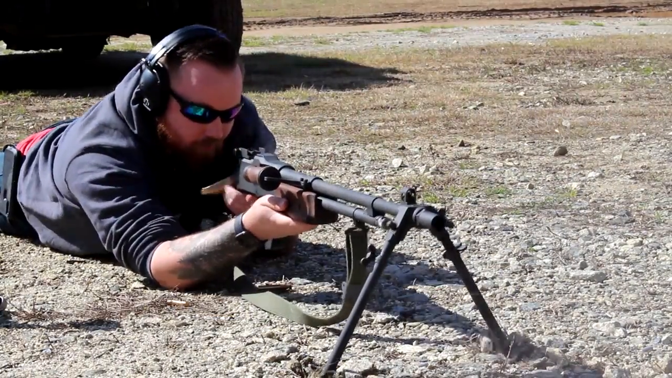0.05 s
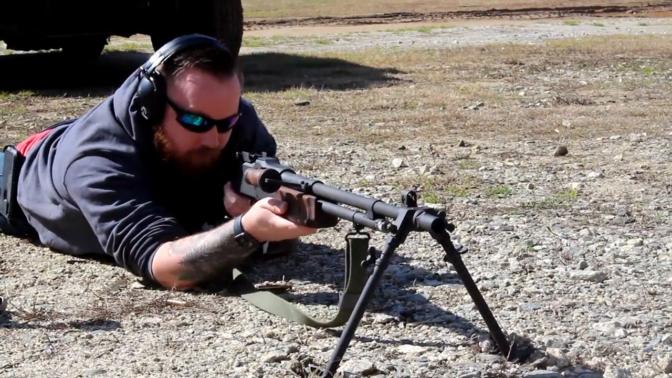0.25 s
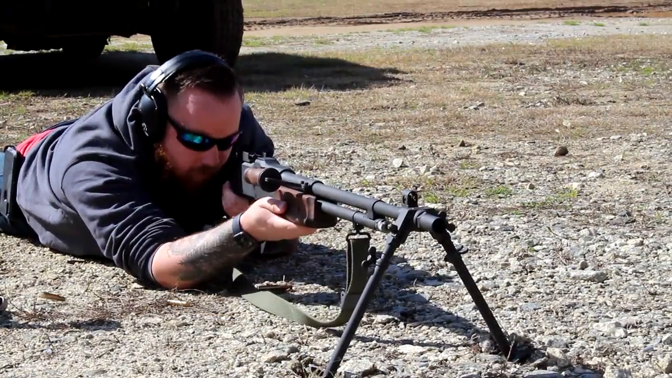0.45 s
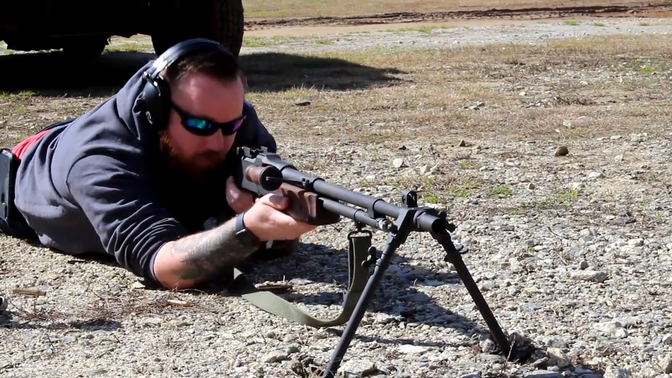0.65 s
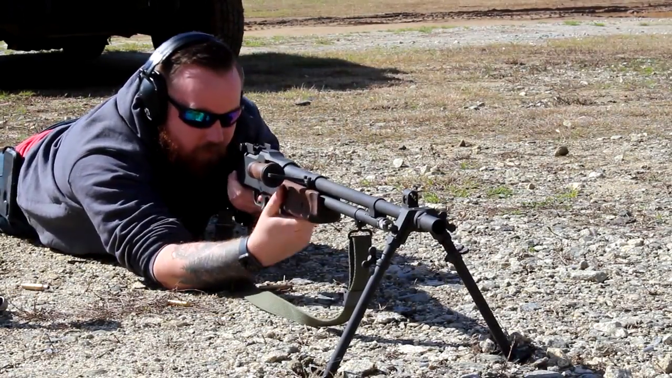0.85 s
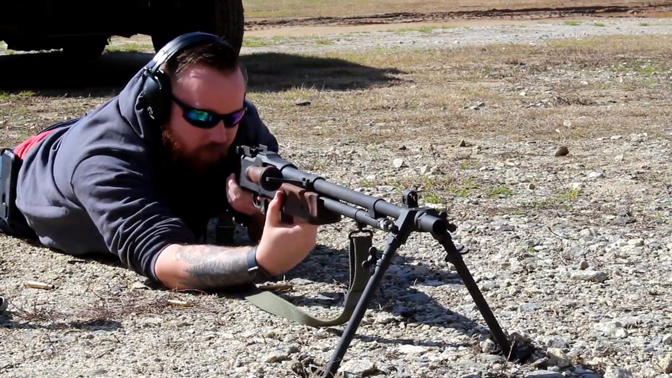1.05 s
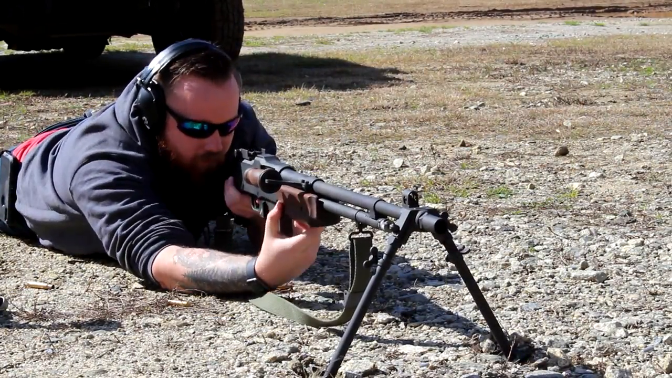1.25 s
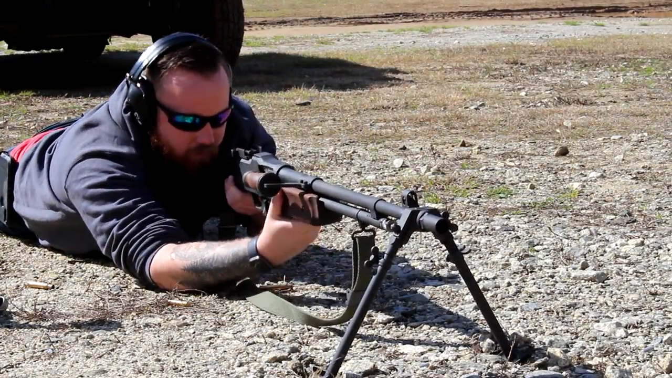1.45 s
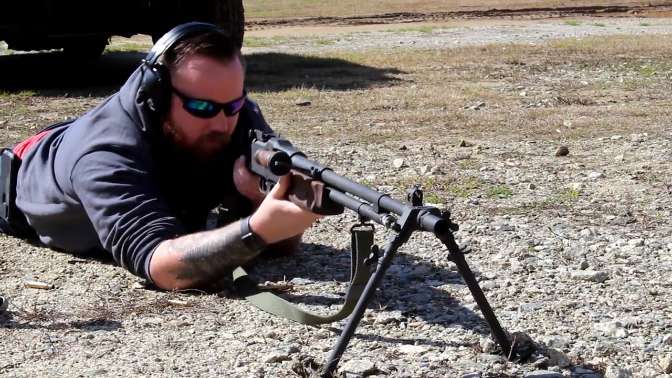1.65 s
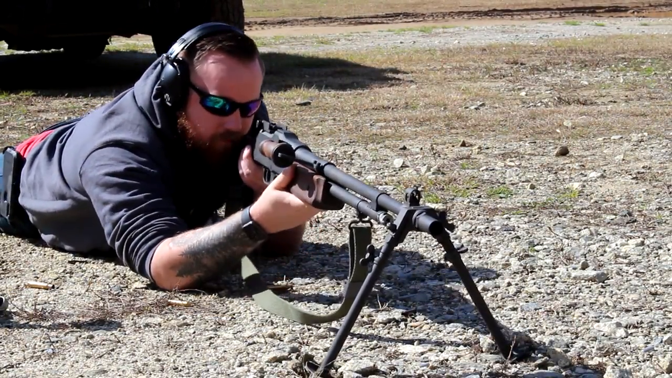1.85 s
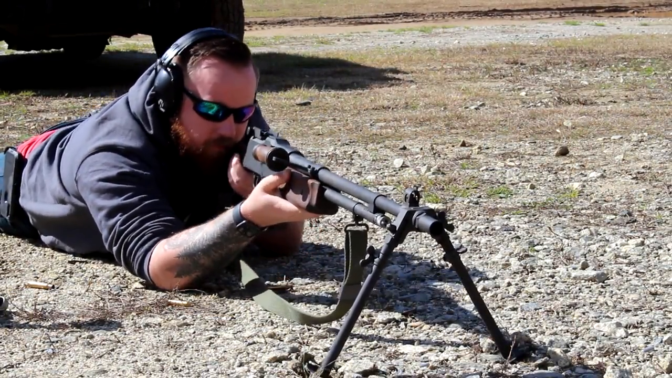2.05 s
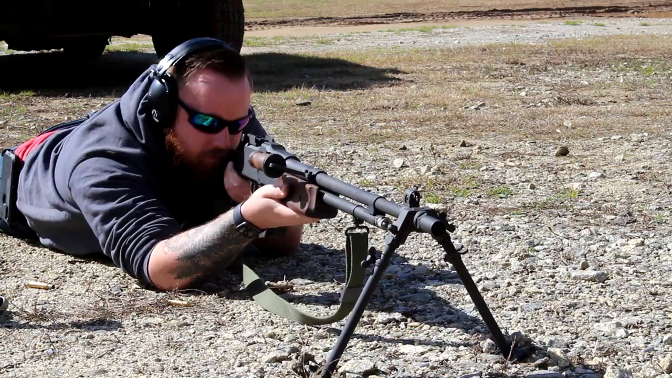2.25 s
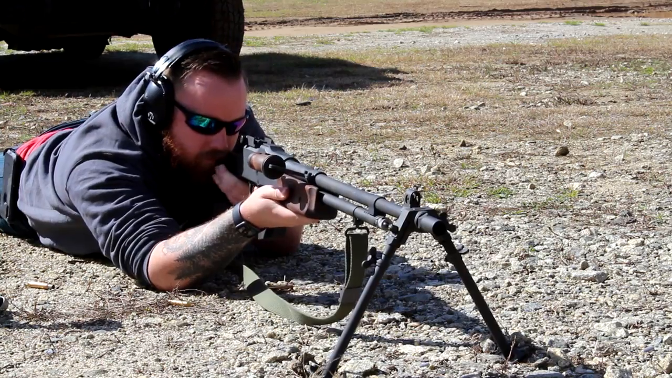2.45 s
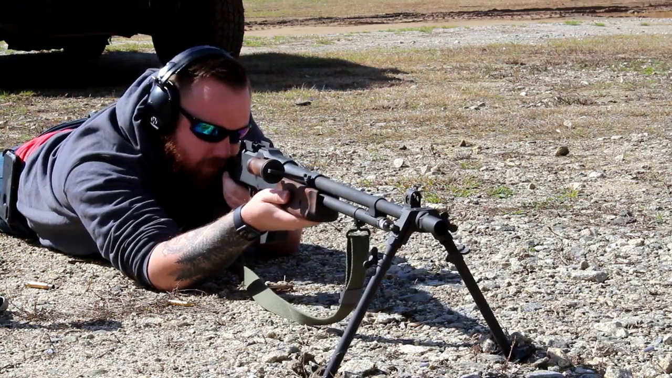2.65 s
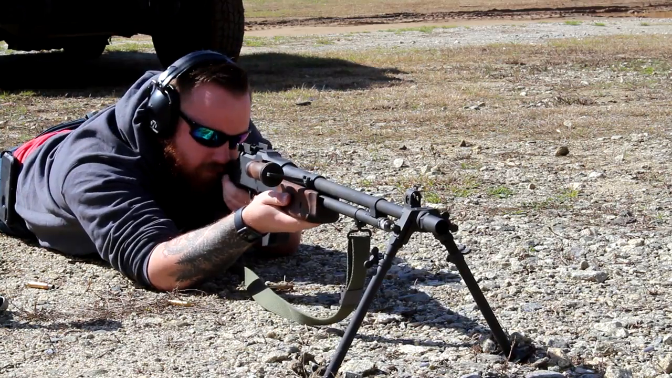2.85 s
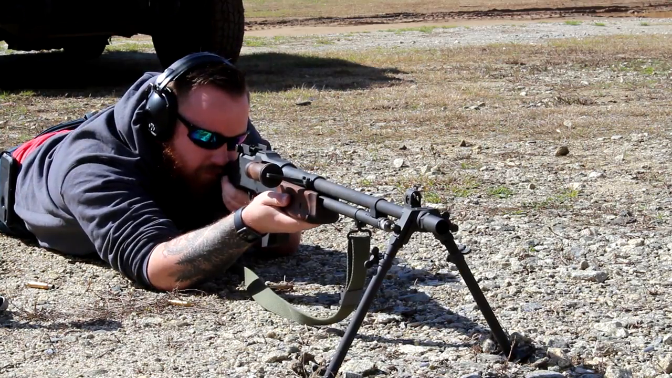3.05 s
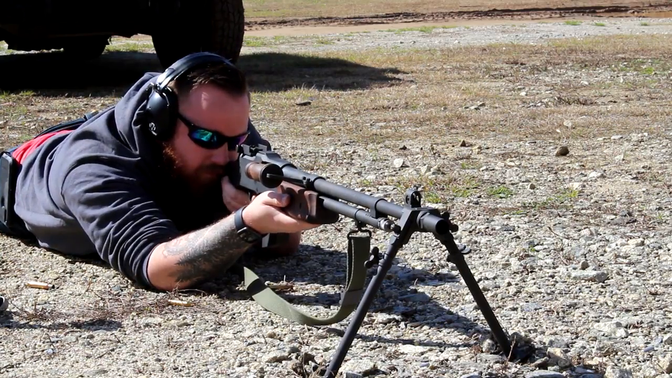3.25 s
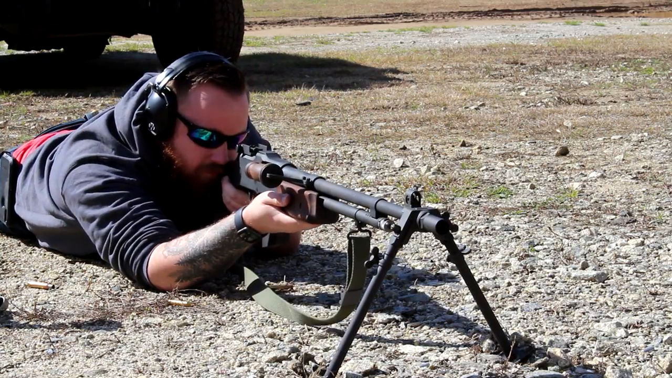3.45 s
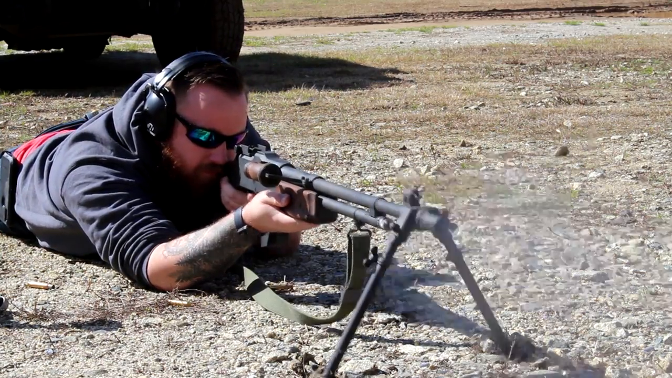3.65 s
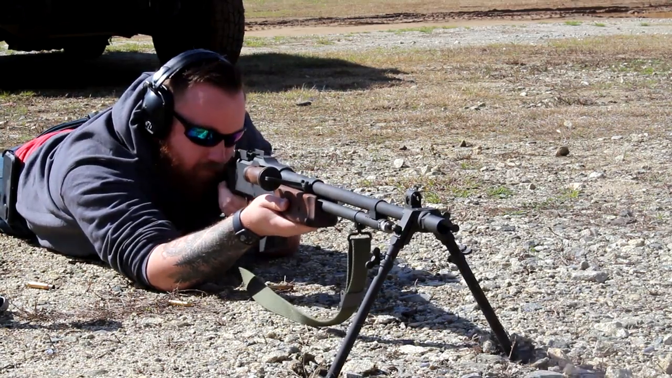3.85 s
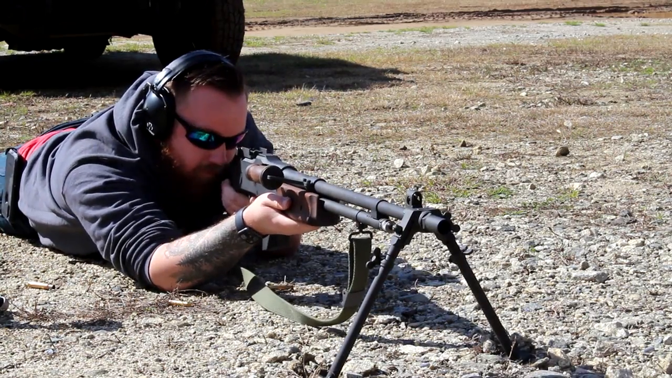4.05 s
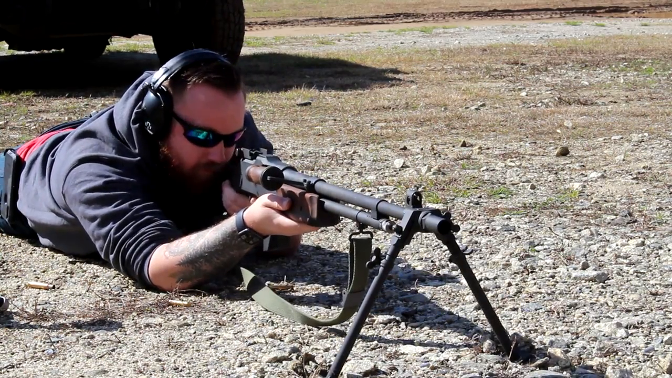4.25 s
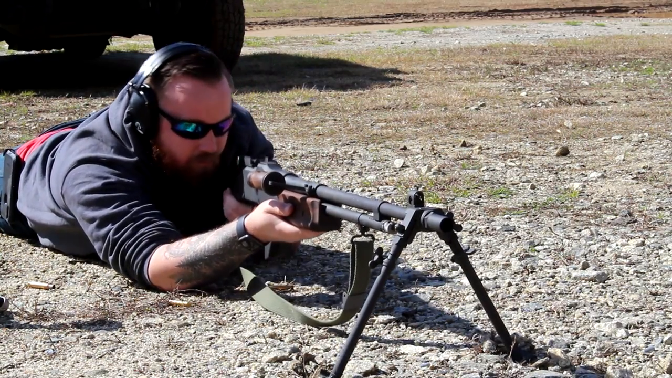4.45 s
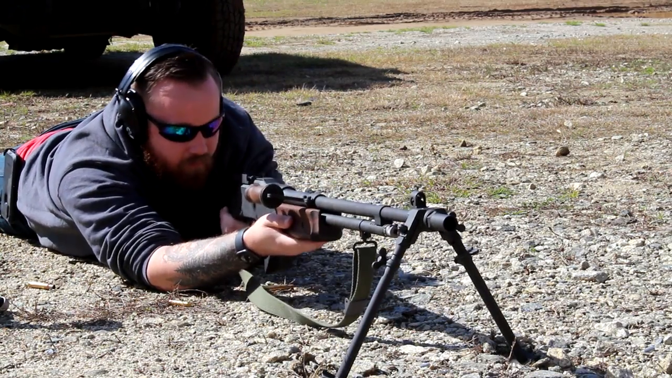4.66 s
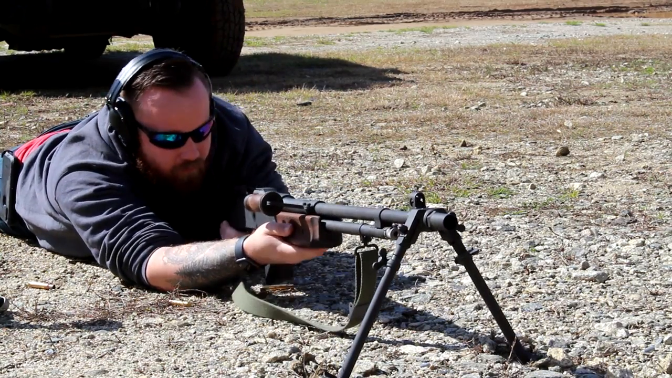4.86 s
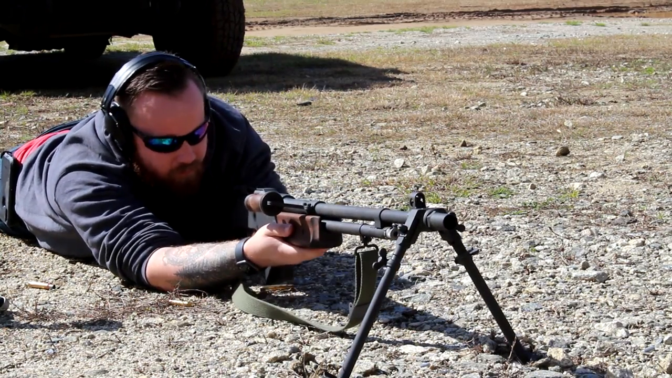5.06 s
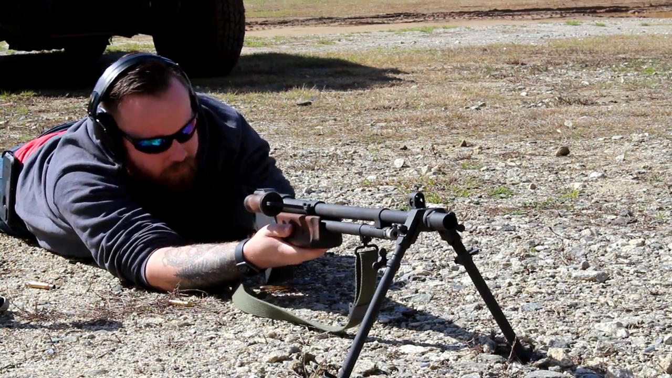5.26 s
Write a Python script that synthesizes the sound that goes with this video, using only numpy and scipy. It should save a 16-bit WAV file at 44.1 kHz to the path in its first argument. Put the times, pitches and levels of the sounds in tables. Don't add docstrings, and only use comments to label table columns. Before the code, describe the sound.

An open gravel range, heard by a camera microphone near the shooter. The tail of an earlier shot is still rolling when, at about 0.02 s, a rifle fires: a flattened, overloaded blast with a gassy roar. About 0.1 s later a low, buzzing slap returns from a ribbed wall, heavier on the left, then clumped echoes from trees and hills, losing treble and sinking to a dull roll over seconds. From 0.4 to 1 s a flying case rings faintly and unevenly, very high. A buckle scrapes softly around 1.1-1.3 s; tiny metal and gravel ticks scatter until 3.4 s. Low wind gusts buffet the microphone, strongest near 0.6, 2.9 and 3.6 s, while ducked hiss slowly returns. At 3.73 s a second, louder shot repeats the slap and rolling echo. Brass clinks quickly on stones around 4.6 s, a sharper tick follows at 4.84 s, and the echo continues fading to the end.

```python
import sys
import numpy as np
from scipy import signal
from scipy.fft import rfft, irfft, next_fast_len
from scipy.io import wavfile
from scipy.ndimage import uniform_filter1d

SR = 44100
rng = np.random.default_rng(int(sys.argv[2]) if len(sys.argv) > 2 else 0)


def pcm_store(signal):
    levels = np.round(np.clip(np.atleast_2d(signal), -1, 1) * 32767)
    wavfile.write(sys.argv[1], SR, levels.astype(np.int16).T)


def field_ratio(decibels):
    return 10 ** (np.asarray(decibels, dtype=float) / 20)


N = 233938
LONG = next_fast_len(N)
TOP_HZ = 15900
EARLIER_SHOT_S = -0.215
# (time [s], blast level [dB])
SHOTS = [
    (0.0218, -7),
    (3.7293, -4),
]


def at(table, hz):
    points_hz, values = np.array(table).T
    return np.interp(np.log(hz + 1), np.log(points_hz), values)


def unit(x):
    return x / np.sqrt(np.mean(x ** 2))


def band(x, lo_hz, hi_hz, order=2):
    limits_hz = [lo_hz, min(hi_hz, 0.45 * SR)]
    return signal.sosfilt(signal.butter(order, limits_hz, "band", fs=SR, output="sos"), x)


def ring(hz, t60, length):
    t = np.arange(int(length * SR)) / SR
    return np.sin(2 * np.pi * hz * t) * np.exp(-np.log(1000) * t / t60)


def walk(rate):
    hold = int(SR / rate)
    goals = np.repeat(rng.standard_normal(N // hold + 1), hold)
    return uniform_filter1d(uniform_filter1d(goals, hold), hold)[:N]


def add(out, x, s):
    i = int(s * SR)
    out[..., i:i + x.shape[-1]] += x[..., :N - i]


def sides(pan_db):
    return np.array([[pan_db], [-pan_db]]) / 2


def swells(events, quiet):
    t = np.arange(N) / SR
    power = quiet ** 2
    for s, db, half_s in events:
        power = power + field_ratio(2 * db) * np.exp(-2 * ((t - s) / half_s) ** 2)
    return np.sqrt(power)


def since_shot():
    t = np.arange(N) / SR
    starts = np.array([EARLIER_SHOT_S, SHOTS[0][0], SHOTS[1][0]])
    shot = np.searchsorted(starts, t, side="right") - 1
    return shot, t - starts[shot]


def sag_db():
    shot, since = since_shot()
    depth_db = np.array([4, 5, -0.5])[shot]
    dropped = (1 + np.tanh((since - 0.42) / 0.11)) / 2
    not_yet_back = (1 - np.tanh((since - 1.2) / 0.28)) / 2
    return depth_db * dropped * not_yet_back


def hiss_gain():
    # (time [s], level [dB], half length [s])
    rustles = [
        (1.66, -68, .04),
        (4.255, -65, .015),
        (4.875, -65, .035),
    ]
    open_db, duck_db, settle_s = -67.5, 22, 1.9
    since = since_shot()[1]
    db = open_db - duck_db * (1 - np.tanh((since - 0.6) / 0.07)) / 2
    db = db - 2 * np.maximum(settle_s - since, 0) - 2 * np.maximum(since - settle_s, 0)
    return swells(rustles, field_ratio(db - 1.2 * sag_db()))


def hiss():
    # (frequency [Hz], level per Hz [dB])
    colour = [(180, -37), (300, -2.5), (470, -4), (519, -10.5), (1480, -20.5), (1610, -18), (4020, -21.5),
              (10200, -31), (16000, -38.5)]
    hz = np.fft.rfftfreq(LONG, 1 / SR)
    crackle_db = 2 * np.minimum(rng.exponential(size=N), 6)
    noise = rng.standard_normal((3, N)) * field_ratio(crackle_db)
    pair = noise[:2] + 0.5 * noise[2]
    out = irfft(rfft(pair, LONG) * field_ratio(at(colour, hz)) * (hz < TOP_HZ), LONG)[:, :N]
    out = out / np.std(band(out.mean(axis=0), 7600, 17000, order=4))
    return out * hiss_gain() * field_ratio(0.51 * walk(8.1))


def wind():
    # (time [s], level [dB], half length [s])
    gusts = [(.35, -47, .09), (.59, -36.5, 0.088), (.81, -55, .07), (1.58, -49., .08), (1.94, -46, .06),
             (2.12, -48, 0.07), (2.45, -41, 0.23), (2.68, -44, 0.036), (2.86, -36, 0.038),
             (3.0, -43, 0.037), (3.14, -46.5, .05), (3.32, -42.5, 0.054), (3.6, -32.5, 0.085),
             (4.35, -50., 0.047), (4.6, -51., 0.081), (5.24, -56, .12)]
    lull_db = -61
    rumble = unit(band(rng.standard_normal((2, N)), 39, 108)) * field_ratio(np.array([[4], [0]]))
    return rumble * swells(gusts, field_ratio(lull_db)) * field_ratio(-3)


def scatterers():
    # (time after the shot [s], level [dB])
    landmarks = [(.058, 9), (0.243, 10), (0.26, 10.5), (.302, 10.5), (.339, 13), (.379, 15), (.462, 12),
                 (.5, 8), (.566, 13), (1.055, 13.5), (1.222, 8.5), (1.338, 3), (1.631, 3), (1.8, 7.5),
                 (1.84, 12.5), (2.247, 4), (2.289, 5), (2.596, 13.5), (2.739, 10)]
    size = rng.standard_normal((2, N)) * field_ratio(2.14 * rng.exponential(size=(2, N)))
    size = unit(size * field_ratio(1.6 * walk(45) + 1.33 * walk(200)))
    t = np.arange(int(0.03 * SR)) / SR
    swell_and_fade = np.exp(-t / 0.0043) * np.minimum(t / 0.002, 1)
    for s, db in landmarks:
        top_hz = 1700 / (s + 0.23)
        burst = unit(band(rng.standard_normal(len(t)), 180, top_hz)) * np.sqrt(2 * top_hz / SR)
        add(size[0], burst * swell_and_fade * field_ratio(db - 2.5), s - 0.002)
    return size


def echo_levels():
    # (time after the shot [s], level at 300 Hz [dB], extra at 1 kHz [dB],
    # rise [dB/s], fall [dB/s])
    terrain = [(0.027, -16.5, -6.5, 28, 334), (.055, -31.5, 1, 303, 250.), (0.097, -20.5, 0.5, 427, 330.),
               (.16, -26, -13, 61, 12.5), (.207, -38.5, 6.5, 1200., 22), (.26, -32.5, 7.5, 400., 55),
               (.32, -31.5, 7, 212, 42.5), (.42, -35, 7.5, 122.5, 25.5), (.54, -33, 8.5, 85, 36),
               (.8, -32.5, -5, 28.5, 18), (1.06, -28.5, -7.5, 45, 23), (1.3, -33, -6, 15.5, 7),
               (1.72, -30, -5.5, 12.5, 17.5), (2.1, -36, -9.5, 6.5, 10.5)]
    shot, since = since_shot()
    low, mid = 0, 0
    for s, db, bright_db, rise, fall in terrain:
        before, after = np.maximum(s - since, 0), np.maximum(since - s, 0)
        power = field_ratio(2 * (db - rise * before - fall * after))
        low = low + power
        mid = mid + power * field_ratio(2 * (bright_db - 2.5 * after))
    gain_db = np.array([1.5, -0.05, -0.53])[shot] - sag_db()
    db_300 = 10 * np.log10(low) + gain_db
    db_1k = 10 * np.log10(mid) + gain_db
    wall_db = 7.5 * np.exp(-((since - 0.095) / 0.039) ** 2)
    slope_db = 4 * (1 + np.tanh((since - 1.44) / 0.11)) / 2
    db_3k = db_1k - 4 - 4.5 * since - wall_db - slope_db
    db_7k = db_3k - 1 - np.minimum(26 * since, 37)
    db_11k = db_7k + 0.93 * (db_7k - db_3k) + 4
    db_15k = db_7k + 2.2 * (db_7k - db_3k) + 7
    bass_db = uniform_filter1d(np.minimum(db_300, -27), int(0.06 * SR))
    bass_db += 5 * np.exp(-((since - 0.45) / 0.9) ** 2) - 0.88 * since
    bass_db -= 6 * np.exp(-((since - 0.14) / 0.08) ** 2)
    return np.array([bass_db, db_300, db_1k, db_3k, db_7k, db_11k, db_15k])


def echo():
    # (frequency [Hz], level per Hz [dB])
    colour = [(35, -62.5), (70, -37.5), (130, -27.5), (300, -23.5), (550, -30), (1000, -30.5), (3000, -32),
              (5000, -34), (7000, -39.5), (11000, -50.5), (16000, -64)]
    # (frequency [Hz], left minus right [dB])
    balance = [(60, 21.5), (110, 15), (200, 13.5), (380, 13), (700, 10.0), (1290, 6), (2380, 2.5),
               (4400, 0.5), (8120, -1), (15000, -3.5)]
    # (frequency [Hz], likeness [0-1])
    likeness = [(60, 0.6), (130, 0.59), (300, 0.89), (700, 0.7), (1500, 0.36), (3000, 0.8), (7000, 0.09),
                (15000, 0.23)]
    repeat_share = 0.7
    size = scatterers()
    since = (since_shot()[1] * SR).astype(int)
    pattern = np.sqrt(repeat_share) * size[:, since] + np.sqrt(1 - repeat_share) * size[:, ::-1]
    hz = np.fft.rfftfreq(LONG, 1 / SR)
    first, second = rfft(pattern, LONG) * field_ratio(at(colour, hz)) * (hz < TOP_HZ) * np.sqrt(SR / 2)

    like = np.clip(at(likeness, hz), 0, 1)
    right = field_ratio(-at(balance, hz))
    late = np.exp(-2j * np.pi * hz * 6e-5)
    level = 2 / np.sqrt(1 + right ** 2 + 2 * like * right)
    mixed = like * first + np.sqrt(1 - like ** 2) * second
    pair = level * np.array([first * late, right * mixed])

    levels, known = echo_levels(), np.log([130, 330, 1000, 3000, 6500, 11000, 15000])
    centres = np.log(117 * 2 ** np.arange(0, 7.1, 0.5))
    out = 0
    for row, centre in zip(np.eye(len(centres)), centres):
        weights = np.array([np.interp(centre, known, weight) for weight in np.eye(len(known))])
        part = irfft(pair * np.interp(np.log(hz + 1), centres, row), LONG)[:, :N]
        out = out + part * field_ratio(weights @ levels)
    return out


def ticks():
    # (time [s], peak level [dB], brightness [octaves from 5.5 kHz], left minus right [dB])
    contacts = [(1.1011, -43, -0.07, -2), (1.104, -39, -.3, -7), (1.319, -40, .1, -2),
                (1.3953, -51, -.2, -2), (1.4892, -45, -.1, 3), (1.515, -40, .3, -3),
                (1.6098, -44, 0.43, -3), (1.7242, -46, -0.23, 0), (1.9796, -42, -.8, -2),
                (2.1203, -43, -1.2, -1), (2.142, -40, -.3, 0), (2.2448, -43, -0.27, 2),
                (2.5244, -40, .3, -1), (2.6913, -37, -.6, 6), (2.8008, -37, -1.2, 0),
                (2.9113, -43, -1.2, -2), (2.9405, -47, 0.31, 4), (3.0789, -52, -.9, 2),
                (3.1605, -48, -1.2, -1), (3.207, -45, -.9, -3), (3.2515, -48, .1, -4),
                (3.3516, -46, .2, -4), (4.2549, -39, -.2, -1), (4.6338, -37, 0.0068, -2),
                (4.837, -27, -0.3, 5), (4.865, -46, .3, -1), (4.8935, -49, .9, 0), (5.0732, -50, .8, -4),
                (5.111, -41, -0.15, -7), (5.27, -53, .5, 0)]
    width = 1.75
    out = np.zeros((2, N))
    t = np.arange(int(0.015 * SR)) / SR
    for s, db, bright, pan_db in contacts:
        hz = 5500 * 2 ** bright
        click = (1 + 0.9 * rng.standard_normal(len(t))) * np.exp(-t / 0.0001)
        click = band(band(click, hz / width, hz * width), 1500, TOP_HZ, order=1)
        peak_db = min(db, -41) + 5
        add(out, click / np.abs(click).max() * field_ratio(peak_db + sides(pan_db)), s)
    return out


def buckle_slide():
    start, end, level_db = 1.11, 1.31, -70
    scrape = 0
    for hz in (6200, 6800):
        noise = unit(band(rng.standard_normal(N), hz - 170, hz + 170))
        scrape = scrape + noise * field_ratio(3 * walk(25.2))
    progress = np.clip((np.arange(N) / SR - start) / (end - start), 0, 1)
    return scrape * field_ratio(level_db) * np.sqrt(np.clip(np.sin(np.pi * progress), 0, 1))


def flying_case():
    # (frequency [Hz], level [dB], time to fade by 60 dB [s])
    case_modes = [
        (7650., -41.5, 0.86),
        (9560., -54., 0.78),
        (9792., -42.5, 0.83),
        (13959., -61, .9),
    ]
    start, end = 0.36, 1.05
    out, t = np.zeros((2, N)), np.arange(N) / SR
    reopening = np.minimum(t / 0.18, 1) ** 1.8
    for hz, db, t60 in case_modes:
        tumble = walk(260) * field_ratio(5.4 * walk(16))
        tone = ring(hz, t60, end - start)
        add(out, tone * (tumble * reopening)[:len(tone)] * field_ratio(db), start)
    return out


def clinks():
    # (time [s], peak level [dB], frequency [Hz], left minus right [dB])
    hits = [
        (4.6009, -45, 6540, -1.5),
        (4.6144, -41, 6570, -5),
        (4.6198, -32, 6370, 5),
        (4.6224, -37, 6600, -10),
        (4.6351, -42, 12900, -6),
        (4.6524, -44, 6140, -5),
        (4.8674, -55, 6600, 6),
    ]
    out = np.zeros((2, N))
    for s, db, hz, pan_db in hits:
        clink = ring(hz, 0.032, 0.05)
        for place in rng.random(3):
            clink = clink + 0.19 * ring(6700 + 6500 * place, 0.025, 0.05)
        t = np.arange(len(clink)) / SR
        grit = rng.standard_normal(len(t)) * np.exp(-t / 0.0038)
        clink = clink + 0.5 * band(grit, 6000, 15500)
        add(out, clink * field_ratio(db - 6.5 + sides(pan_db)), s)
    return out


def slaps():
    # (time after the shot [s], level [dB], frequency [Hz], length [s])
    returns = [
        (.0903, -8.5, 335, 0.0077),
        (.0965, -2.5, 300., 0.0097),
        (.1112, -9, 288, 0.01),
        (.1265, -5.5, 298, 0.0047),
        (.134, -20, 290, 0.011),
    ]
    out = np.zeros((2, N))
    for shot_s, _ in SHOTS:
        for s, db, hz, length in returns:
            t = np.arange(int(length * SR)) / SR
            fade = np.cos(np.pi / 2 * (t / length) ** 2)
            train = np.tanh(0.77 * np.sin(2 * np.pi * hz * t)) * fade * field_ratio(db)
            add(out, train * field_ratio(np.array([[0], [-6]])), shot_s + s)
    return band(out, 164, 2800)


def blast():
    lead, t = int(0.004 * SR), np.arange(int(0.07 * SR)) / SR
    swing = -ring(323, 0.0095, 0.07) * field_ratio(8.5)
    shared = band(rng.standard_normal(len(t)), 780, 2980)
    own = band(rng.standard_normal((2, len(t))), 410, 4260)
    roar = unit(shared * np.array([[1], [0.5]]) + 0.76 * own)
    thud = unit(band(rng.standard_normal(len(t)), 140, 690)) * field_ratio(np.array([[-3], [-9]]))
    pressure = swing + (roar + thud) * field_ratio(2.5) * np.exp(-t / 0.0071)
    limiter = 0.37 + 1.92 * np.exp(-t / 0.0032)
    overloaded = np.tanh(pressure * field_ratio(8)) * limiter * np.exp(-(t / 0.054) ** 2)
    clack = unit(band(rng.standard_normal(lead), 300, 9000, order=1))
    clack = clack * np.sqrt(np.linspace(0, 1, lead)) * field_ratio(-23)
    return np.concatenate([clack * np.ones((2, 1)), overloaded], axis=1), lead / SR


def scene():
    out = echo() + ticks() + buckle_slide() + flying_case() + clinks() + slaps()
    for s, db in SHOTS:
        wave, lead_s = blast()
        add(out, wave * field_ratio(db), s - lead_s)
    return signal.sosfilt(signal.butter(2, 70, "high", fs=SR, output="sos"), out) + hiss() + wind()


def masked(x):
    # (frequency [Hz], share [dB])
    hiding = [(5000, -90.), (7000, -48.5), (9000, -49.5), (12000, -61), (15600, -70.5), (15950, -49),
              (20000, -36)]
    hz, s, z = signal.stft(x, SR, nperseg=2048)
    power = np.sum(np.abs(z) ** 2, axis=0)
    bands = power[:-1].reshape(64, 16, -1).sum(axis=1)
    limit_db = at(hiding, hz[8::16])[:, None]
    since = np.min([np.where(s > shot_s - 0.03, s - shot_s, 9) for shot_s, _ in SHOTS], axis=0)
    limit_db = limit_db - 7 * np.clip((since - 0.65) / 0.45, 0, 1)
    limit_db = limit_db + 3 * rng.standard_normal(bands.shape)
    hidden = bands < power.sum(axis=0) * field_ratio(2 * limit_db)
    z[:, :-1] *= np.repeat(hidden, 16, axis=0)
    return signal.istft(z, SR)[1][:, :N]


def low_pass(x):
    return signal.sosfilt(signal.butter(12, 16910, fs=SR, output="sos"), x)


def record(dry):
    clipped = np.clip(dry, -1, 1)
    return low_pass(clipped - masked(clipped))


dry = scene()
out = record(dry)
pcm_store(out)
```